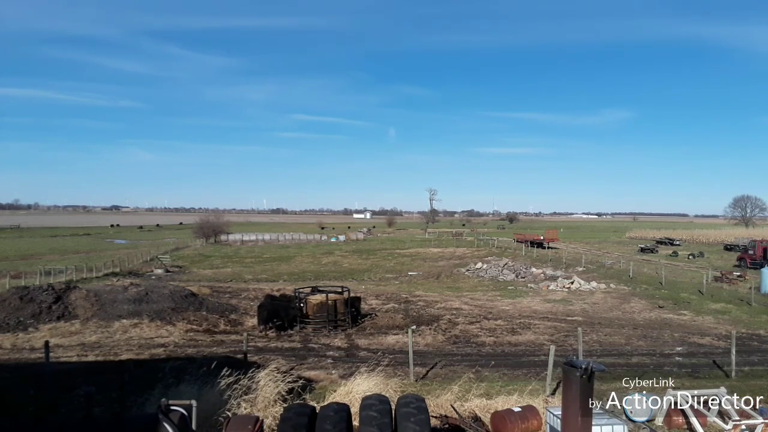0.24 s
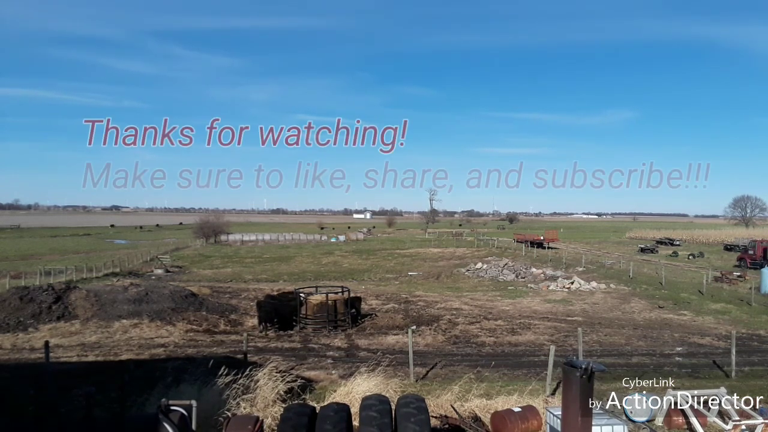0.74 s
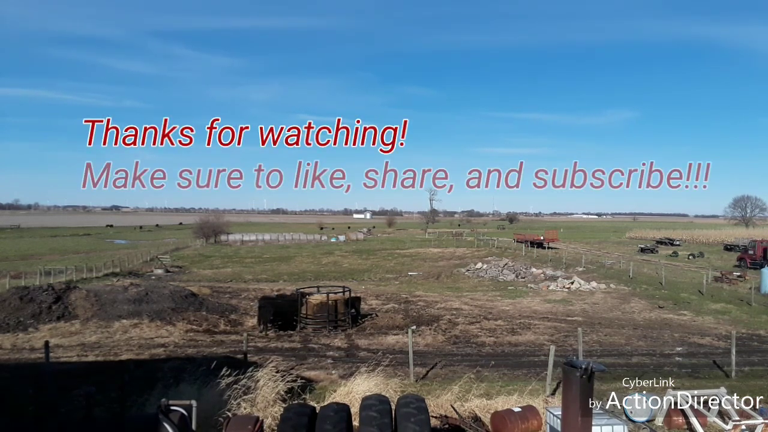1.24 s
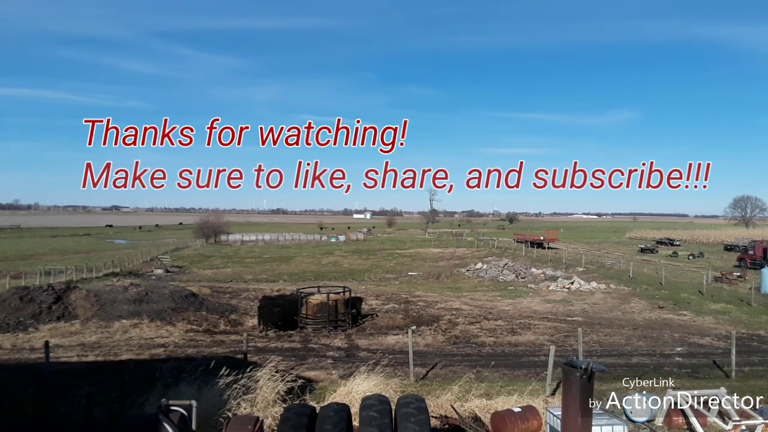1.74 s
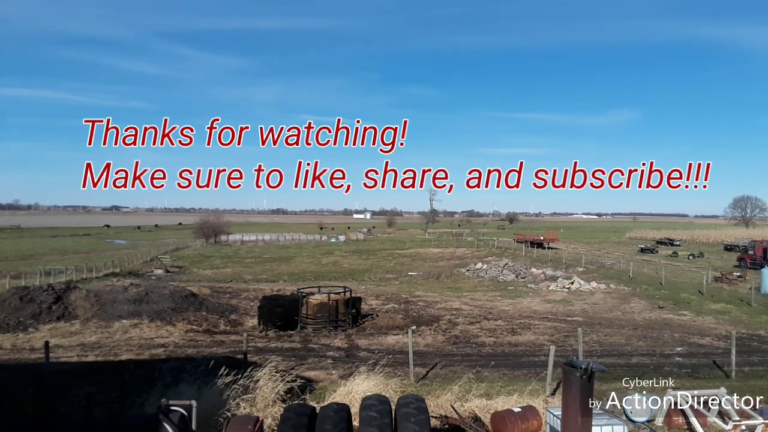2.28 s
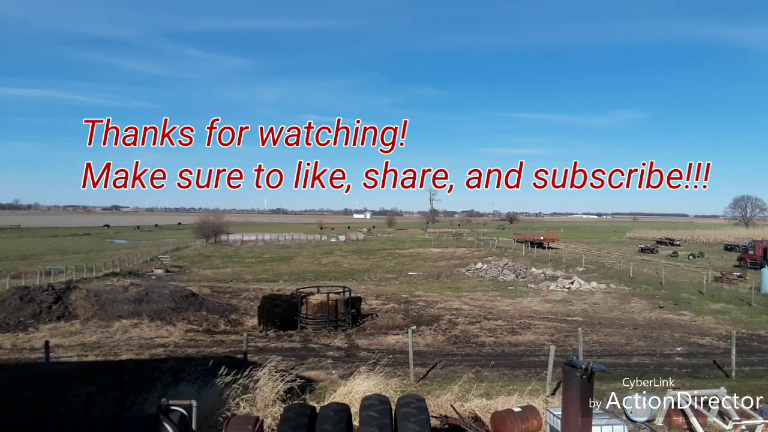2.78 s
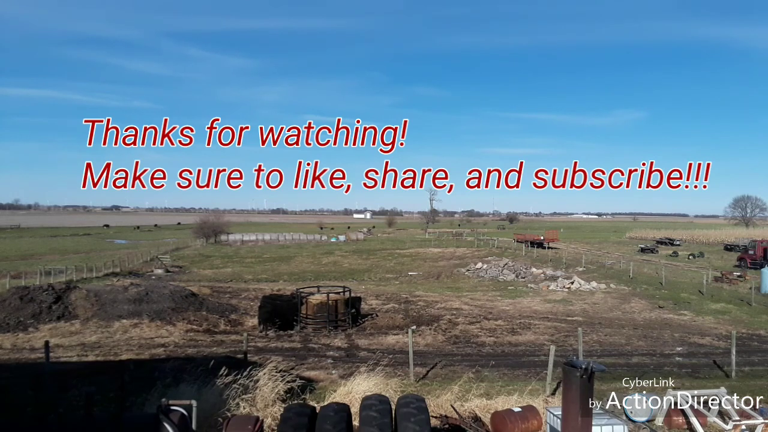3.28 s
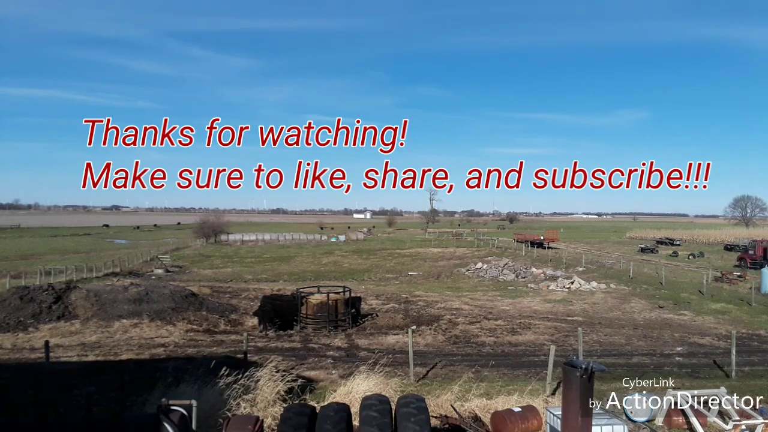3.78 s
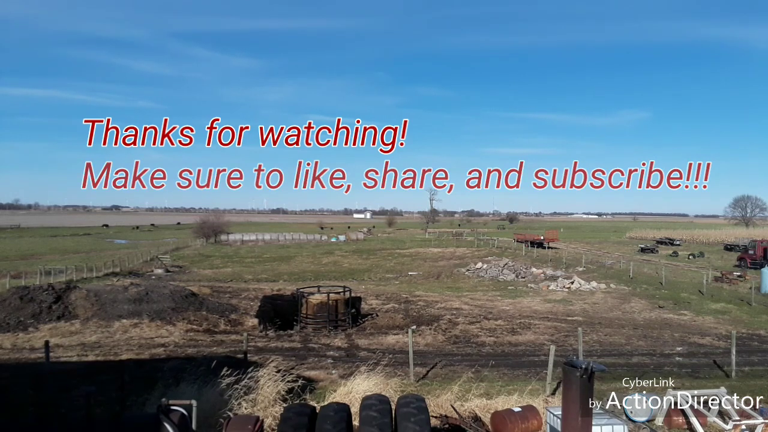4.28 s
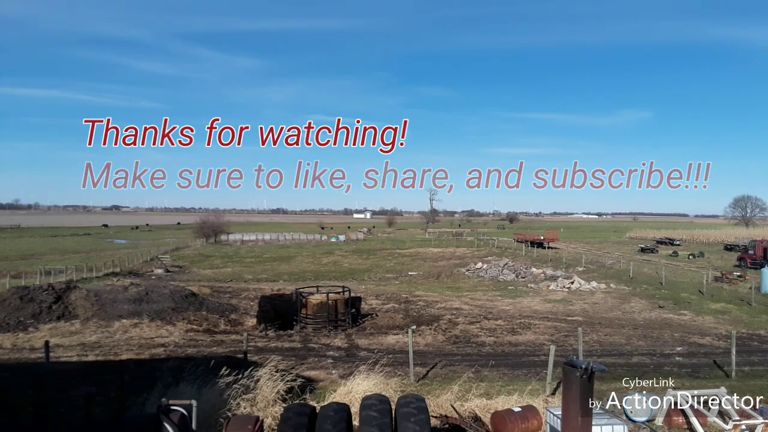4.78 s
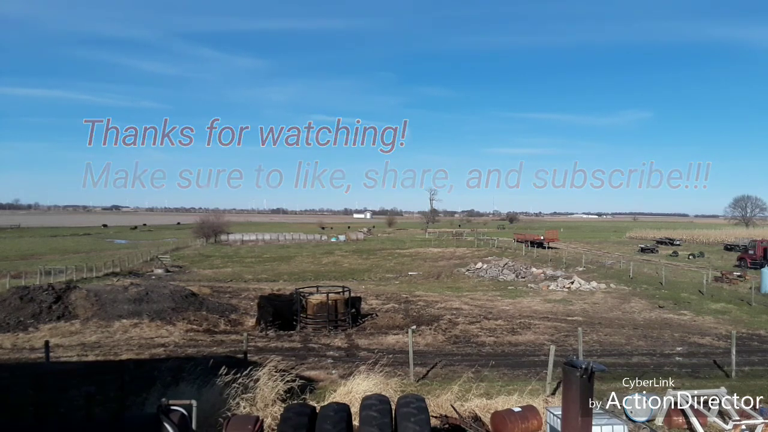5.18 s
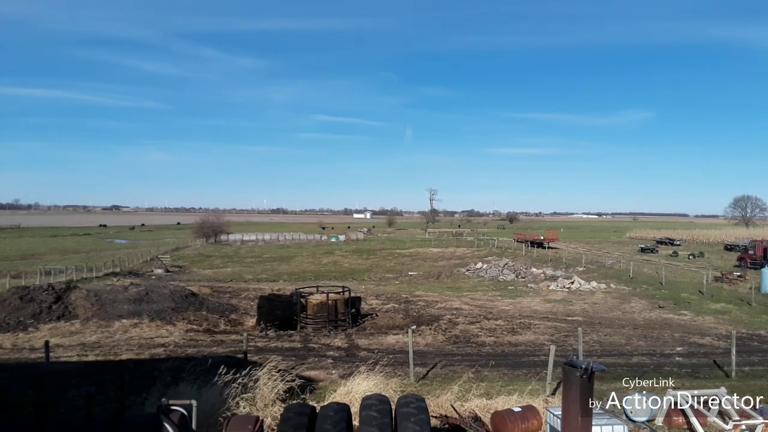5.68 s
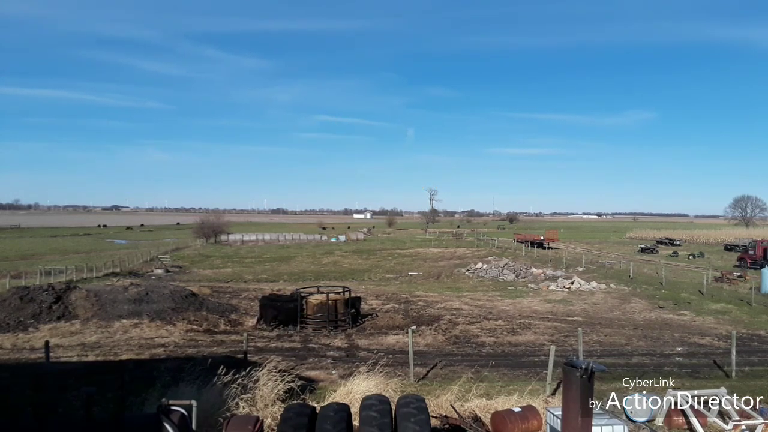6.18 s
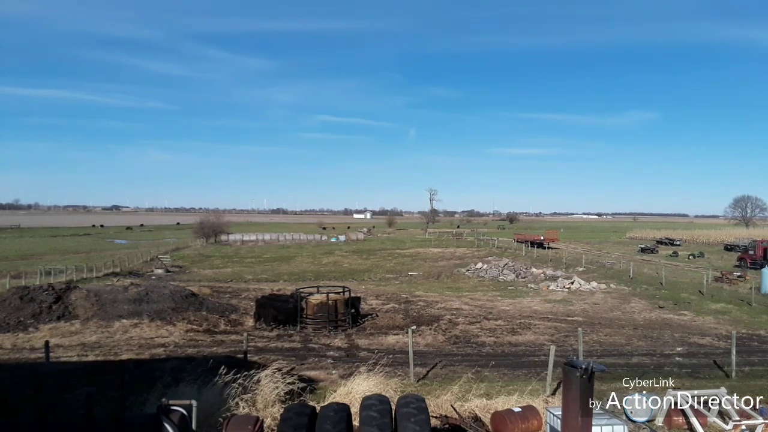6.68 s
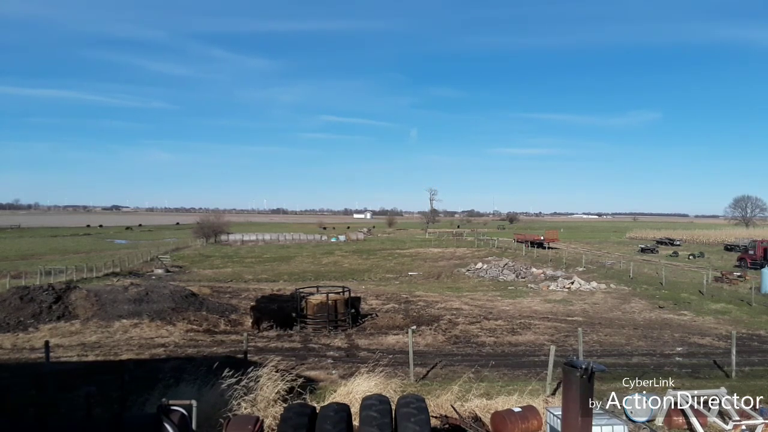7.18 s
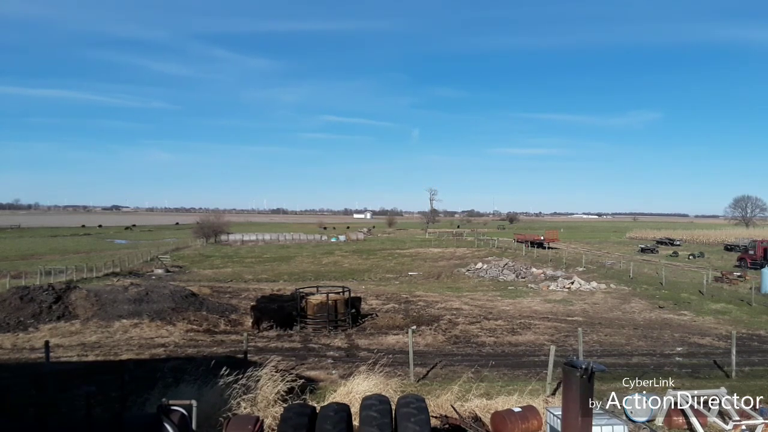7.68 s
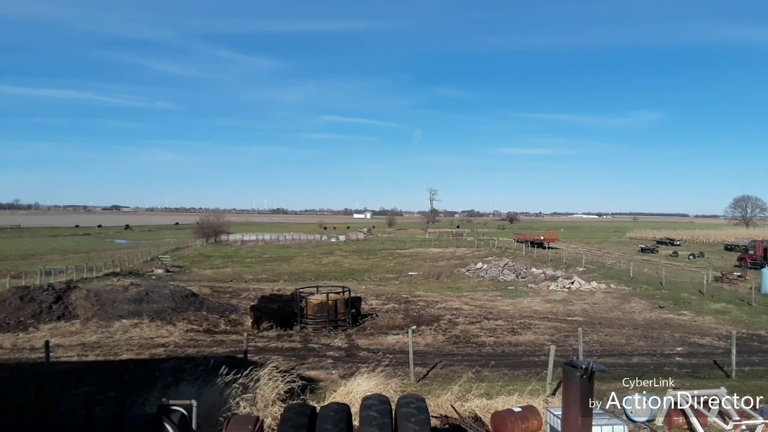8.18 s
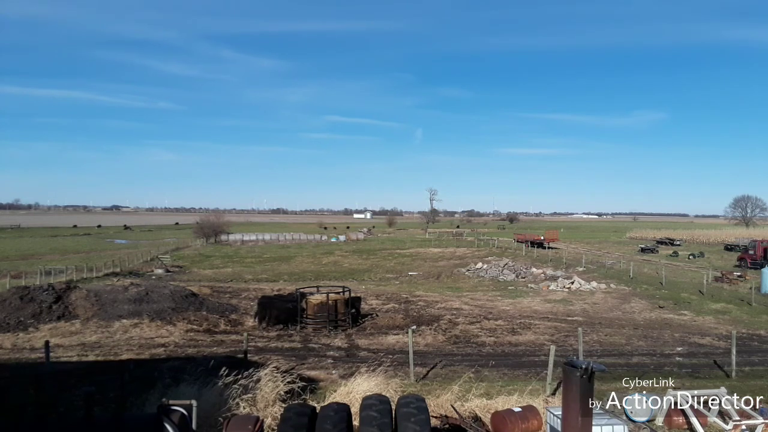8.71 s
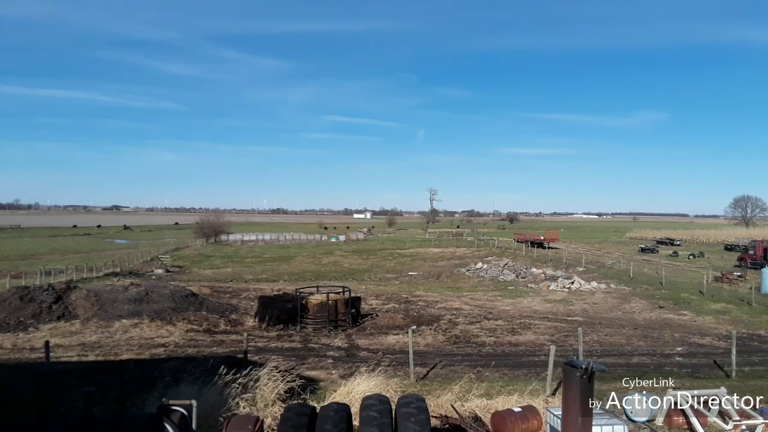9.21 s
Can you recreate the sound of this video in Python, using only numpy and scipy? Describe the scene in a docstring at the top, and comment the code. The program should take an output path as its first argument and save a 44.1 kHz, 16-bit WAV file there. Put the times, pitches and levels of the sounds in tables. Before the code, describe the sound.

From the first moment a small drone motor races on the right, a raspy buzzing whine with wavering pitch and bright airy hiss. A fainter, higher motor whines further away and fades by about 2.5 seconds. The near one swells and moves toward the centre, loudest around 1.5 seconds, with a thin gliding squeal from 1.3 to 2 and small dry ticks. It recedes, still whining, then from 3.2 to 3.9 slides down more than an octave to a soft, low, fluttering putter. This idle holds until 6.7; faint squeaky chirps come at 4.6 to 5.2 and 5.5, with barely audible dull scuffs and a steady fine machine buzz beneath. At 7 it revs sharply, drops back around 7.7, surges roughly at 7.9, dips at 8.3, then climbs to a strong, racing whine until the end at 9.45. Open air, dry, close stereo microphone.

```python
"""Small motor revving

A small high-revving motor, by its sound a model two-stroke, races, drops to a putter and revs up again.
Each turn pulses through the exhaust pipe; rasp, whine and hiss follow the shaft. At first it lies to the right.
A second motor of a few orders whines further off and fades; a squeal of gliding overtones joins the first.
Chirps of sagging overtones, ticks and scuffs of noise, and a steady machine's repeating cycle lie underneath."""
import sys
import numpy as np
from scipy import signal
from scipy.fft import rfft, irfft, next_fast_len
from scipy.io import wavfile
from scipy.ndimage import uniform_filter1d, map_coordinates

SR = 44100
rng = np.random.default_rng(int(sys.argv[2]) if len(sys.argv) > 2 else 0)


def to_wav(s):
    """Save 16-bit WAV."""
    ch = np.atleast_2d(s).T  # columns
    pcm = np.round(np.clip(ch, -1, 1) * 32767)  # PCM
    wavfile.write(sys.argv[1], SR, pcm.astype(np.int16))


N = 416744
TOP_HZ = 15500  # nothing sounds above this

# Speed of the motor shaft. Each row: time in seconds, turns per second.
SPEED = [(0, 222), (.04, 209), (.08, 228), (.12, 240), (.19, 254), (.22, 249), (.285, 281), (.35, 276),
         (.41, 267), (.56, 287), (.67, 292), (.77, 264), (.89, 299), (1.02, 285), (1.29, 279), (1.44, 299),
         (1.6, 267), (1.75, 254), (1.92, 251), (2.08, 293), (2.24, 316), (2.29, 287), (2.37, 269.5),
         (2.62, 290), (2.95, 283), (3.13, 285), (3.19, 315), (3.235, 306), (3.38, 220), (3.44, 209),
         (3.49, 211), (3.58, 199), (3.755, 185), (3.8, 151), (3.88, 121), (4.13, 115), (4.33, 116),
         (4.57, 113.5), (4.61, 110.5), (4.65, 117), (4.69, 117.5), (4.74, 112.5), (4.96, 114), (5.16, 118),
         (5.28, 123), (5.32, 119.5), (5.41, 125.5), (5.45, 120.5), (5.59, 121), (5.65, 127.5), (5.73, 123),
         (5.87, 126), (5.91, 121), (5.97, 119.5), (6.04, 123.5), (6.09, 122), (6.18, 126.5), (6.25, 119),
         (6.37, 122), (6.51, 123.5), (6.58, 120.5), (6.65, 124), (6.75, 114.7), (6.796, 136.4), (6.9, 137),
         (6.94, 115), (6.996, 153), (7.03, 152), (7.106, 216), (7.19, 250), (7.274, 264), (7.376, 249.5),
         (7.444, 259), (7.55, 191), (7.636, 160), (7.684, 123), (7.72, 119), (7.84, 125), (7.914, 172.5),
         (7.958, 170), (8, 221), (8.05, 255), (8.12, 280), (8.25, 294), (8.275, 250), (8.32, 206),
         (8.37, 236), (8.45, 270), (8.55, 286), (8.79, 292), (8.92, 306), (8.97, 297), (9.27, 327),
         (9.45, 313)]
# Loudness of the exhaust note, which surges and dips. Each row: time in seconds, level in dB.
NOTE_LEVEL = [(0.0, -30), (0.05, -39), (0.07, -34), (0.11, -27.5), (0.21, -33.5), (0.37, -32), (0.39, -41),
              (0.41, -29.5), (0.45, -36.5), (0.48, -28.5), (0.76, -29.5), (0.87, -25.5), (0.93, -31),
              (0.98, -23), (1.03, -28.0), (1.08, -24.0), (1.13, -27.5), (1.16, -23), (1.23, -25.5),
              (1.25, -29), (1.38, -21), (1.42, -24), (1.45, -19.5), (1.49, -25), (1.51, -21.0),
              (1.6, -26.5), (1.66, -22.5), (1.7, -25.5), (1.81, -24.5), (1.86, -27), (2.04, -26.5),
              (2.11, -28.5), (2.31, -30), (2.34, -32.5), (2.41, -29), (2.45, -31.5), (2.51, -29.0),
              (2.68, -33), (2.72, -35.5), (2.76, -34.5), (2.9, -35.5), (2.97, -32), (3.09, -34.5),
              (3.14, -33.0), (3.18, -34.5), (3.27, -30.5), (3.3, -36), (3.46, -35), (3.63, -37),
              (3.75, -34.5), (3.82, -42.5), (3.87, -38.5), (4.02, -42.5), (4.06, -40), (4.16, -40.5),
              (4.77, -40), (5.29, -41.0), (5.42, -40.0), (5.81, -41), (5.85, -40.5), (5.99, -41.0),
              (6.2, -40), (6.28, -41.5), (6.43, -40), (6.73, -42), (6.78, -38), (6.92, -38.5),
              (6.93, -43.5), (6.98, -36.0), (7.1, -35.5), (7.12, -31.5), (7.16, -37), (7.2, -35.0),
              (7.59, -39.0), (7.66, -44.0), (7.83, -45.5), (7.88, -41.5), (7.99, -37.0), (8.1, -40.5),
              (8.14, -36.5), (8.25, -35.5), (8.28, -32), (8.4, -37.5), (8.45, -33.5), (8.49, -36),
              (8.65, -34), (8.77, -37.5), (8.84, -32.5), (8.86, -39.5), (8.88, -32.5), (9.12, -32.0),
              (9.19, -34), (9.21, -28.5), (9.29, -36), (9.32, -31), (9.44, -30.0)]
# Colour of the exhaust pipe when idling. Each row: frequency in Hz, gain in dB.
COOL_PIPE = [(120, -50), (240, -34), (360, -13.5), (480, -6.5), (600, -5.5), (720, 3), (850, 6.5),
             (970, 4.5), (1090, 12), (1200, 0.5), (1310, -30), (1700, -44), (2200, -61)]
# Colour of the exhaust pipe when hot. Each row: frequency in Hz, gain in dB.
HOT_PIPE = [(150, -66), (275, -24), (325, -18.5), (400, -22), (500, -2.5), (560, -5), (645, 1), (760, 2),
            (880, 6.5), (1050, 10), (1200, 14), (1420, 5), (1500, 1.5), (1620, -18.5), (1800, -5),
            (2300, -57.5)]
# Trim of the note's orders. Each row: time in seconds, third order in dB, fifth order and above in dB.
ORDER_TRIM = [(0, -1, 9), (.13, -4, 21), (.22, 3, 5.5), (.35, -4.5, -2), (.65, 0, 5), (.75, 0, -3),
              (.82, -6, 1), (.91, 5, 10), (1, -3, -3), (1.08, -1, 8), (1.21, -6, 13.5), (1.27, -4, -9),
              (1.35, -4.5, 1), (1.52, -4.5, 4.5), (1.6, -2, 3), (1.85, -6.5, 6.5), (2.05, 0, 1.5),
              (2.2, 0.5, 2), (2.8, -1.5, 0), (3.05, -2, 0), (3.2, 4.5, 1), (3.3, 1.5, -0.5), (3.7, -10, 7),
              (6.9, -10, 5), (7.3, 1, 4.5), (7.8, -18, 4.5), (8.2, -3, 3.5), (8.45, -3, 3), (8.7, -3, 3),
              (9, -4.5, 7), (9.2, -7, 4), (9.45, 0, 7)]
IDLE_HZ, HOT_SPAN_HZ = 140.6, 121.2  # turns per second up to which the pipe is cool; this much more is hot
SWELL_DB, SWELL_RATE = 2.2, 16  # slow swell of each order when hot, in dB, and its knots a second
IDLE_FLUTTER_DB, HOT_FLUTTER_DB = .8, 2  # quick flutter of the fourth order; in proportion up to twice that
PIPE_SMEAR = .55  # how far the pipe draws each pulse out, 0-1
HOT_BLUR, BLUR_RATE = .21, 55  # phase stray of the orders when hot, in radians, and its knots a second

# Unsteadiness of the speed, as a fraction of it, and its knots a second.
IDLE_HUNT, HOT_HUNT, HALF_HEAT_HUNT, HUNT_RATE = .006, .003, .009, 50
IDLE_JITTER, HOT_JITTER = .0022, .005  # scatter of even firing, in turns; ragged firing scatters more
RAGGED_HZ_PER_S = 970  # slowing that counts as a raggedness of 1, which is capped at 0.4
RAGGED_SCATTER = 1.2  # how much raggedness widens the spread of firing strength
# Brief weak firings. Each row: time in seconds, half length in seconds, level change in dB.
STUMBLES = [(1.489, 0.0067, -3.5), (6.74, .008, -3)]
# Brief rough surges. Each row: time in seconds, half length in seconds, raggedness from 0 to 1.
SURGES = [(3.755, .024, 0.3), (7.914, .05, 0.5), (8.304, 0.052, 0.75)]
SPLUTTER_DB = -8  # noise of a surge at raggedness 1, against the note

# The motor comes nearer and draws off. Each row: time in seconds, gain in dB.
NEARNESS = [(0, 3.5), (.35, 0.5), (1.45, 9.5), (2, 6.5), (2.8, -1.6), (3.7, 1.4), (3.95, -1), (4.8, -1),
            (6.7, -3), (7.3, -2.5), (7.7, -7), (8.7, -1.5), (9, 2), (9.45, 2.5)]
# Treble against the motor's base level. Each row: time in seconds, rasp in dB, hiss in dB.
TREBLE = [(0, -6, -7.5), (.7, -6, -11), (1.25, -9.5, -12.5), (1.6, -16, -12), (1.95, -14, -12.5),
          (2.2, -14, -12), (2.65, -11, -9), (3.3, -15.5, -14.5), (4, -16.5, -16.5), (6.9, -14.5, -14),
          (7.3, -13.5, -9), (7.75, -7, -6), (8.35, -9.5, -13), (8.7, -10.5, -13.5), (8.95, -11.5, -10.5),
          (9.45, -11, -18)]
RACING_HZ = 285  # turns per second at racing speed
RACING_DB, DB_PER_OCTAVE = -33.5, 3.5  # base level of rasp, hiss and air at racing speed; growth with speed
PULL_DB, PULL_HZ_PER_S = 3.5, 2200  # extra rasp under full acceleration, and that acceleration
SAG_S, SAG_HALF_S = 7.825, 0.043  # a brief dip of the treble: time and half length in seconds
SAG_RASP_DB, SAG_HISS_DB = -3.5, -9.5

# Colour of the noisy rasp. Each row: frequency in Hz, level in dB per Hz.
RASP_COLOUR = [(250, -48), (500, -13.5), (1000, 1.5), (1600, 0.5), (2000, -1.5), (2650, -2.5), (3100, -5),
               (3500, -35), (5000, -24), (9000, -67)]
# Clear whine in the rasp. Each row: time in seconds, share from 0 to 1, trim of its lowest order in dB.
CLARITY = [(0, 0.06, -1), (.3, 0.57, -6), (.65, 0.87, -7), (1.25, 0.81, -1.5), (1.8, 0.4, 12),
           (2.2, 0.8, 3), (3, 0.46, 3), (4, 0.27, -10), (7, 0.06, 8), (8.1, 0.8, -3), (8.55, 0.84, -9),
           (9.2, 0.89, 0)]
# Colour of the whine. Each row: frequency in Hz, gain in dB.
WHINE_COLOUR = [(1100, -22), (1450, -9), (1720, -4.5), (2000, -2.5), (2300, -5.5), (2600, -9.5),
                (2900, -11.5), (3200, -11.5), (3700, -24)]
WHINE_FLUTTER_DB, WHINE_EAR_DB = 2.6, 2  # shimmer of the whine, and its swing apart in each ear
WHINE_BLUR = .25  # phase stray in radians
# The pipe barks in a buzzing band. Each row: time in seconds, half length in seconds, level in dB.
BARKS = [(1.834, 0.13, -44), (2.16, 0.084, -55), (2.663, 0.18, -51), (7.07, 0.034, -49), (7.365, 0.21, -51),
         (7.617, 0.052, -50), (7.765, 0.062, -53), (7.92, 0.083, -46.5), (8.301, .04, -64)]
# Centre of that band at the lowest speed, its rise in Hz per extra turn a second, and its half width.
BARK_HZ, BARK_RISE, BARK_WIDTH_HZ = 1710, 7.35, 260

# Colour of the hiss at speed. Each row: frequency in Hz, level in dB.
RACING_HISS = [(1200, -25), (2800, 3.5), (3800, 3.5), (5500, 0.5), (8000, -1.5), (10500, -4), (13000, -5),
               (15500, -8)]
# Colour of the hiss at idle. Each row: frequency in Hz, level in dB.
IDLE_HISS = [(1200, -20.5), (2800, -3), (3800, -2), (5800, -3), (7000, -6), (9000, -5), (10300, -8.5),
             (11500, -13.5), (15500, -13.5)]
# Ringing metal parts. Each row: frequency in Hz, width in Hz, gain in dB, start in seconds, end in seconds.
CASING_MODES = [(5670, 320, 1, 0.87, 9.5), (7220, 560, -4, 1.24, 9.5), (9600, 240, -3, 0.21, 1.2),
                (10560, 270, -3.5, 0.67, 12), (11500, 130, 3, 1.6, 2.9), (12000, 250, -2, 0.13, 1.2),
                (12560, 220, 4.5, 1.4, 9.45)]
# Gain of the top of the hiss. Each row: time in seconds, gain in dB.
SIZZLE = [(0, 7), (1.5, 5.5), (3, 1.5), (7.2, 0)]
SIZZLE_HZ = 7300  # where that top begins
# Colour of the low rush of air. Each row: frequency in Hz, level in dB per Hz.
AIR_COLOUR = [(20, -10), (50, -9), (120, -7.5), (250, -5), (450, 1.5), (900, 6.5), (2000, -36)]
AIR_DB = -28  # against the motor's base level

# Direction of the note and rasp, from the right to ahead. Each row: time in seconds, degrees to the right.
BEARING = [(0, 27), (.35, 46), (1, 28), (1.75, 5), (2.1, -5), (2.6, -1), (8.6, 0), (9.1, -11)]
PORT_GAP_M = .021  # distance between the two listening ports
# Phase between the ports. Each row: frequency in Hz, radians by which left leads.
PORT_PHASE = [(0, 0.23), (4650, -0.13), (5600, -0.17), (6200, -0.13), (8790, -0.27), (9470, 0.29),
              (15800, -0.0)]
# Stereo likeness of noise. Each row: frequency in Hz, left-right likeness from 0 to 1.
LIKENESS = [(50, 0.99), (150, 0.64), (600, 0.8), (2000, 1), (4000, 0.88), (8000, 0.46), (14000, 0.42)]

# A thin squeal while the motor is near. Each row: time in seconds, unsounded fundamental in Hz, level in dB.
WHISTLE = [(1.2, 1640, -85), (1.32, 1700, -51), (1.42, 1800, -49), (1.52, 1900, -48), (1.6, 1815, -47),
           (1.66, 1778, -47), (1.72, 1760, -53), (1.79, 1664, -49), (1.88, 1670, -48), (1.97, 1668, -53),
           (2.06, 1660, -85)]
# Overtones of the squeal. Each row: multiple of the fundamental, level in dB.
WHISTLE_ORDERS = [(3, -9), (4, -7), (5, 1)]
# The far motor. Each row: time in seconds, turns per second, level in dB.
FAR_MOTOR = [(0, 435, -34), (.2, 405, -41), (.42, 348, -44.5), (.6, 405, -39), (.77, 374, -45),
             (.9, 370, -44), (1.05, 374, -43.5), (1.35, 404, -48), (1.6, 430, -47), (1.9, 346, -47.5),
             (2.5, 365, -110)]
# Orders of the far motor. Each row: multiple of its turns, level in dB.
FAR_ORDERS = [(1, -16), (2, -.5), (3, -8), (4, -15), (5, -18), (6, -18)]
# Thin chirps. Each row: start in seconds, length in seconds, unsounded fundamental in Hz,
# level in dB, dullness of the upper overtones in dB.
CHIRPS = [(4.64, .05, 2080, -53, 4), (4.681, .035, 2020, -55, 1), (4.712, .04, 2150, -50, 4.5),
          (4.775, .045, 1990, -52, 8), (5.044, .042, 2100, -47.5, 6), (5.09, .04, 2015, -56, .5),
          (5.124, .045, 2110, -45.5, 7.5), (5.196, .035, 1950, -53, 8), (5.515, .035, 2880, -52, 4.5)]
# Sharp ticks. Each row: start in seconds, level in dB.
TICKS = [(1.5993, -36), (1.744, -40), (7.218, -39.5)]
# Soft low scuffs. Each row: time in seconds, half length in seconds, level in dB.
SCUFFS = [(4.338, .04, -57), (5.97, .02, -59), (6.222, .14, -57)]
# Colour of the scuffs. Each row: frequency in Hz, level in dB per Hz.
SCUFF_COLOUR = [(150, -31), (350, -6), (520, -2), (800, -3.5), (1500, -37)]

# Colour of the steady machine's buzz. Each row: frequency in Hz, level in dB.
BUZZ_COLOUR = [(200, -25), (500, -8), (1400, 1), (2000, 1), (2800, -3), (4500, -1), (5700, 1), (9000, 0),
               (10500, -4), (11500, -8), (15500, -14)]
# Orders that sing out of the buzz. Each row: multiple of its cycle rate, level in dB.
BUZZ_TONES = [(6, -79), (12, -66), (26, -70), (30, -71), (33, -72), (38, -72), (39, -69), (48, -69),
              (59, -70), (108, -69.5), (111, -74), (168, -75), (207, -79)]
# Gain of the whole machine. Each row: time in seconds, gain in dB.
BUZZ_LEVEL = [(2.8, 0), (3.9, 1.5), (6.9, 1.5), (7.5, 0), (7.8, -8)]
BUZZ_HZ, BUZZ_DRIFT = 51.85, .0005  # cycles a second, and their drift as a fraction
BUZZ_SCATTER_DB, BUZZ_DB = 3, -56.5  # scatter of the lines, and level of the comb before its gain


def amp(db):
    """Decibels to gain."""
    return np.exp(np.asarray(db) * (np.log(10) / 20))


def unit(x):
    """Scale to rms 1."""
    return x / np.sqrt(np.mean(x ** 2) + 1e-20)


def along(points, hz):
    """Read (Hz, value) points on a log frequency axis."""
    f, v = np.transpose(points)
    return np.interp(np.log(hz + 1), np.log(f + 1), v)


def curves(rows):
    """One value per sample for each column after the time."""
    s, *cols = np.transpose(rows)
    return [np.interp(np.arange(N) / SR, s, c) for c in cols]


def wobble(rate):
    """A smooth random curve, rate knots a second."""
    knots = rng.standard_normal(int(N * rate / SR) + 4)
    # smooth at every 64th sample, straight lines between
    coarse = map_coordinates(knots, [np.arange(N // 64 + 2) * 64 * rate / SR])
    steps = np.diff(coarse)[:, None] * np.arange(64) / 64
    return (coarse[:-1, None] + steps).ravel()[:N]


def bell(s, half):
    """A smooth swell of height 1 around time s."""
    return np.exp(-((np.arange(N) / SR - s) / half) ** 2)


def filtered(x, response):
    """Shape x by a response of frequency."""
    m = next_fast_len(N + SR // 2)
    return irfft(rfft(x, m) * response(np.fft.rfftfreq(m, 1 / SR)), m)[..., :N]


def coloured(x, spectrum):
    """Give x a (Hz, dB) colour, at rms 1."""
    return unit(filtered(x, lambda hz: amp(along(spectrum, hz))))


def stereo_noise():
    """White noise whose left-right likeness varies with frequency."""
    def mid_side(hz):
        turn = np.arccos(np.clip(along(LIKENESS, hz), -1, 1)) / 2
        return np.array([np.cos(turn), np.sin(turn)])

    mid, side = filtered(rng.standard_normal((2, N)), mid_side)
    return unit(np.array([mid + side, mid - side]))


def motor(scatter_db=1.06):
    """Exhaust note, rasp, hiss and rushing air, all driven by one shaft."""
    speed, = curves(SPEED)
    heat = np.clip((speed - IDLE_HZ) / HOT_SPAN_HZ, 0, 1)
    acceleration = uniform_filter1d(np.gradient(speed), size=SR // 20) * SR
    pull = np.clip(acceleration / PULL_HZ_PER_S, 0, 1)
    note_db, rasp_db, hiss_db, air_db = levels(speed, pull)

    # firing turns ragged as the speed drops, and in the surges
    overrun = np.clip(-acceleration / RAGGED_HZ_PER_S, 0, .4)
    ragged = sum(share * bell(s, half) for s, half, share in SURGES)
    hunt_depth = IDLE_HUNT * (1 - heat) + HOT_HUNT * heat + HALF_HEAT_HUNT * np.sin(np.pi * heat)
    hunting = hunt_depth * wobble(HUNT_RATE)
    jitter = IDLE_JITTER * (1 - heat) + HOT_JITTER * heat
    steady_turns = np.cumsum(speed * (1 + hunting)) / SR
    turns = steady_turns + jitter * (1 + 4 * (overrun + ragged)) * wobble(160)

    # one random strength per turn, spread widest when idling or slowing
    strength = rng.standard_normal(N)[np.abs(turns).astype(int)]
    firing_db = scatter_db * (1 - 0.45 * heat + RAGGED_SCATTER * overrun) * strength
    firing_db = uniform_filter1d(firing_db, size=SR // 400)
    firing_db = firing_db + sum(db * bell(s, half) for s, half, db in STUMBLES)

    # at speed the note flutters quickly
    note = amp(note_db + .6 * heat * wobble(70)) * exhaust(speed, turns, heat, count=11)

    # the rasp is part whine, part noise
    share, sixth_db = curves(CLARITY)
    clear = np.clip(share, 0, 1)
    rough = coloured(crackle(turns, buzz=0.0011, gating=0.0081), RASP_COLOUR)
    clean = whine(speed, turns, sixth_db, count=12)
    rasp = amp(rasp_db) * (np.sqrt(clear) * clean + np.sqrt(1 - clear) * rough)
    rasp = rasp + amp(note_db + SPLUTTER_DB) * ragged * rough

    # the hiss crossfades from idling to racing
    racing = coloured(casing(crackle(turns, buzz=0.003, gating=0.082), flicker_db=-6.5), RACING_HISS)
    idling = coloured(crackle(turns, buzz=0.048, gating=0.044), IDLE_HISS)
    hiss = amp(hiss_db + 0.93 * wobble(45)) * (np.sqrt(heat) * racing + np.sqrt(1 - heat) * idling)

    air = amp(air_db) * coloured(stereo_noise(), AIR_COLOUR)
    pulses = amp(firing_db) * (note + rasp + bark(speed, turns, rough=0.72, count=18))
    return placed(pulses) + sizzling(hiss) + air


def levels(speed, pull):
    """Note, rasp, hiss and air in dB; the last three grow with speed and nearness, the rasp also with pull."""
    near_db, = curves(NEARNESS)
    rasp_db, hiss_db = curves(TREBLE)
    base_db = RACING_DB + near_db + DB_PER_OCTAVE * np.log2(speed / RACING_HZ)
    sag = bell(SAG_S, SAG_HALF_S)
    rasp_db = base_db + PULL_DB * pull + SAG_RASP_DB * sag + rasp_db
    hiss_db = base_db + hiss_db + SAG_HISS_DB * sag
    return curves(NOTE_LEVEL)[0], rasp_db, hiss_db, base_db + AIR_DB


def causal(spectrum):
    """Log gain and phase of a ringing body with this colour, one complex value per Hz."""
    cepstrum = irfft(np.log(amp(along(spectrum, np.arange(SR // 2 + 1)))))
    # folding the cepstrum forward gives minimum phase
    cepstrum[1:SR // 2] *= 2
    cepstrum[SR // 2 + 1:] = 0
    return rfft(cepstrum)


def exhaust(speed, turns, heat, count):
    """Orders of the firing rate ring the pipe, whose colour moves from cool to hot as the motor speeds up."""
    cool, hot = causal(COOL_PIPE), causal(HOT_PIPE)
    third_db, upper_db = curves(ORDER_TRIM)
    flutter_db = IDLE_FLUTTER_DB * (1 - heat) + HOT_FLUTTER_DB * heat
    note, power = np.zeros(N), np.zeros(N)
    for k in range(1, count + 1):
        hz = (k * speed).astype(int)
        pipe = cool[hz] + heat * (hot[hz] - cool[hz])
        swell_db = heat * SWELL_DB * wobble(SWELL_RATE)
        trim_db = third_db * (k == 3) + upper_db * (k >= 5)
        order_flutter_db = flutter_db * min(k / 4, 2) * wobble(60)
        gain = np.exp(pipe.real) * amp(swell_db + trim_db + order_flutter_db)
        stray = PIPE_SMEAR * pipe.imag + HOT_BLUR * heat * wobble(BLUR_RATE)
        note += gain * np.cos(2 * np.pi * k * turns + stray)
        power += gain ** 2 / 2
    return note / np.sqrt(power)  # the level table alone sets the loudness


def whine(speed, turns, sixth_db, count):
    """Clean upper orders glide with the shaft and shimmer a little, differently in each ear."""
    out = np.zeros((2, N))
    for k in range(6, count + 1):
        shimmer = np.minimum(wobble(16), 1) + 0.96 * wobble(60)
        level = along(WHINE_COLOUR, k * speed) + sixth_db * (k == 6) + WHINE_FLUTTER_DB * shimmer
        apart = WHINE_EAR_DB * wobble(21)
        tone = np.cos(2 * np.pi * k * turns + WHINE_BLUR * wobble(BLUR_RATE))
        out += amp([level + apart, level - apart]) * tone
    return out


def edges(turns):
    """One sharp pressure step at each turn."""
    swing = np.cos(np.pi * (turns - np.floor(turns)))
    return unit(np.diff(swing * np.abs(swing) ** 14, prepend=1))


def crackle(turns, buzz, gating):
    """A sharp edge at each turn, mixed with turbulence that swells just after it."""
    puff = 1 + np.clip(gating, 0, 1) * np.cos(2 * np.pi * (turns - .2))
    buzz = np.clip(buzz, 0, 1)
    return np.sqrt(buzz) * edges(turns) + np.sqrt(1 - buzz) * unit(puff * stereo_noise())


def bark(speed, turns, rough, count):
    """High orders flare up fitfully in a band that climbs with the speed."""
    centre = BARK_HZ + BARK_RISE * (speed - speed.min())
    buzz = np.zeros(N)
    for k in range(count // 2, count):
        in_band = np.exp(-((k * speed - centre) / BARK_WIDTH_HZ) ** 2)
        buzz += in_band * np.cos(2 * np.pi * k * turns + rough * wobble(120))
    envelope = sum(amp(db) * bell(s, half) for s, half, db in BARKS)
    return unit(buzz * amp(3.5 * wobble(35))) * envelope


def resonance(x, hz, width):
    """Pass x through one ringing mode."""
    return signal.lfilter(*signal.iirpeak(hz, hz / width, SR), x)


def casing(x, flicker_db):
    """Narrow metal resonances come and go over a flat response."""
    t = np.arange(N) / SR
    out = x
    for hz, width, db, start, end in CASING_MODES:
        present = np.clip(.5 + np.minimum(t - start, end - t) / .3, 0, 1)
        flicker = amp(db + flicker_db * np.tanh(wobble(6)))
        out = out + present * flicker * resonance(x, hz, width)
    return out


def sizzling(hiss):
    """The top of the hiss is strongest at first and eases off."""
    top_db, = curves(SIZZLE)
    top = filtered(hiss, lambda hz: 1 - 1 / (1 + (hz / SIZZLE_HZ) ** 8))
    return hiss + (amp(top_db) - 1) * top


def placed(x):
    """Sound from one side reaches the far port a moment later."""
    degrees, = curves(BEARING)
    lag = PORT_GAP_M * np.sin(np.radians(degrees)) / 343 * SR  # samples; sound travels 343 m/s
    return np.array([map_coordinates(ear, [np.arange(N) + way * lag], mode="nearest")
                     for ear, way in zip(x, (-.5, .5))])


def whistle():
    """An unsteady squeal of gliding overtones that come and go."""
    hz, db = curves(WHISTLE)
    turns = np.cumsum(hz * (1 + .005 * wobble(400))) / SR
    return sum(amp(db + level + 3 * wobble(25)) * np.sin(2 * np.pi * k * turns)
               for k, level in WHISTLE_ORDERS)


def far_motor():
    """A second motor, a few fluttering orders of one unsteady shaft, fading away."""
    speed, db = curves(FAR_MOTOR)
    turns = np.cumsum(speed * (1 + 0.0092 * wobble(70.8))) / SR
    orders = sum(amp(level + 2.55 * wobble(40.2)) * unit(np.sin(2 * np.pi * k * turns))
                 for k, level in FAR_ORDERS)
    return amp(db) * orders


def chirps(droop=0.028, rough=.016, patchy_db=2, echo_db=-5):
    """Short rough squeaks that sag in pitch, heard by their overtones and followed by an echo."""
    out = np.zeros(N)
    waver = 1 + rough * wobble(500)
    for s, length, hz, db, fall_db in CHIRPS:
        u = np.linspace(0, 1, int(length * SR))
        span = slice(round(s * SR), round(s * SR) + len(u))
        phase = 2 * np.pi * np.cumsum(hz * waver[span] * (1 + droop * (.5 - u))) / SR
        # the lowest overtone keeps its level, the others are patchy
        patches_db = patchy_db * rng.standard_normal(5) * (np.arange(5) > 0)
        overtone_db = db - fall_db * np.sqrt(2 * np.arange(5)) + patches_db
        overtones = sum(amp(level) * np.sin(k * phase) for k, level in enumerate(overtone_db, 2))
        out[span] += np.sin(np.pi * u) * overtones
    return out + amp(echo_db) * surroundings(out[None], t60=0.19)


def ticks(t60=0.062):
    """Tiny dry snaps: bursts of bright noise that die at once."""
    envelope, t = np.zeros(N), np.arange(SR // 20) / SR
    for s, db in TICKS:
        envelope[round(s * SR):][:len(t)] += amp(db + 3 - 60 * t / t60)  # starts 3 dB above the table
    return envelope * coloured(stereo_noise(), [(800, -36), (3500, 17), (14000, -10)])


def scuffs():
    """Soft low scuffs: swells of dull noise."""
    envelope = sum(amp(db) * bell(s, half) for s, half, db in SCUFFS)
    return coloured(stereo_noise(), SCUFF_COLOUR) * envelope


def hum(size=8192):
    """A steady machine: one short cycle repeats, giving a fine comb of lines, a few of which sing out."""
    turns = np.cumsum(BUZZ_HZ * (1 + BUZZ_DRIFT * wobble(4))) / SR
    hz = BUZZ_HZ * np.arange(size // 2 + 1)
    line_db = along(BUZZ_COLOUR, hz) + BUZZ_SCATTER_DB * rng.standard_normal(len(hz))
    # the ears share a random phase and drift apart towards the treble
    shared = rng.uniform(0, 2 * np.pi, len(hz))
    apart = np.minimum(hz / 9000, .8) * rng.standard_normal((2, len(hz)))
    cycles = irfft(amp(line_db) * (hz < TOP_HZ) * np.exp(1j * (shared + apart)))
    comb = unit(np.array([np.interp(turns % 1, np.arange(size) / size, cycle, period=1)
                          for cycle in cycles]))
    tones = np.sqrt(2) * sum(amp(db + wobble(5)) * np.sin(2 * np.pi * k * turns) for k, db in BUZZ_TONES)
    return amp(curves(BUZZ_LEVEL)[0]) * (amp(BUZZ_DB) * comb + tones)


def surroundings(x, t60=0.12):
    """Ground and nearby things scatter a short answer, different in each ear."""
    t = np.arange(SR // 5) / SR
    tail = rng.standard_normal((2, len(t))) * amp(-60 * t / t60) * (1 - np.exp(-t / 0.027))
    tail /= np.linalg.norm(tail, axis=1, keepdims=True)
    return signal.fftconvolve(x.mean(axis=0)[None], tail, axes=1)[:, :N]


def scene():
    """Everything in open air, with a faint scatter and no walls."""
    direct = motor() + whistle() + far_motor() + chirps() + ticks() + scuffs() + hum()
    return direct + amp(-29.0) * surroundings(direct)


def record(dry):
    """Brief fades at both ends; the two ports hear slightly out of step, up to the band limit."""
    samples = np.arange(N)
    fade = np.minimum(np.minimum(samples, samples[::-1]) / (.006 * SR), 1)

    def ports(hz):
        return np.exp(np.outer([.5j, -.5j], along(PORT_PHASE, hz))) * (hz < TOP_HZ)

    return filtered(dry * fade, ports)


dry = scene()
out = record(dry)
to_wav(out)
```